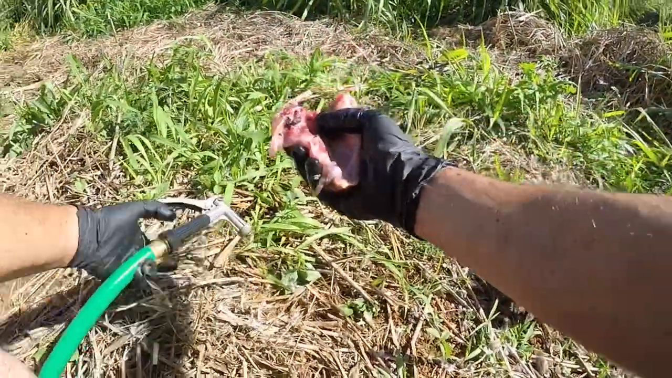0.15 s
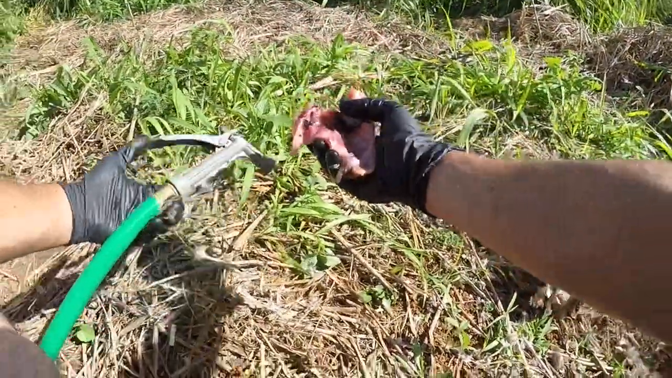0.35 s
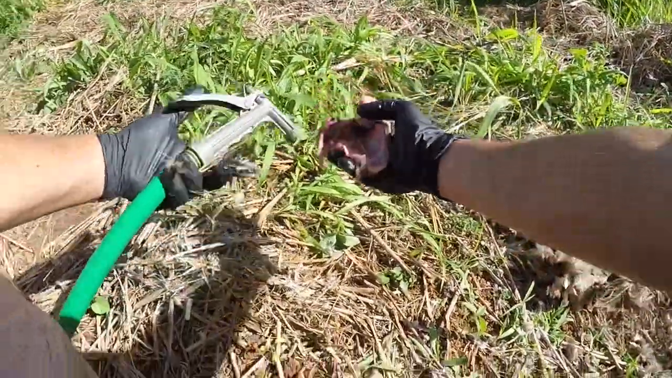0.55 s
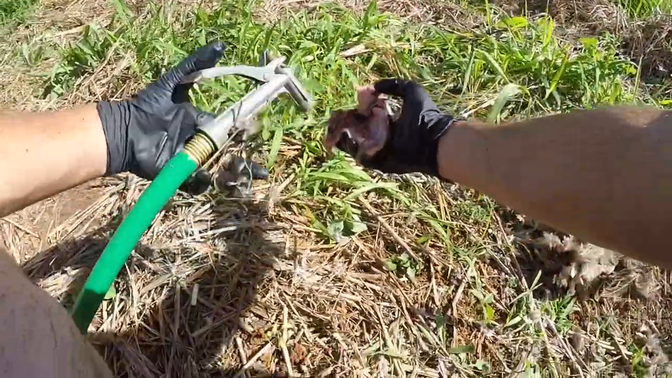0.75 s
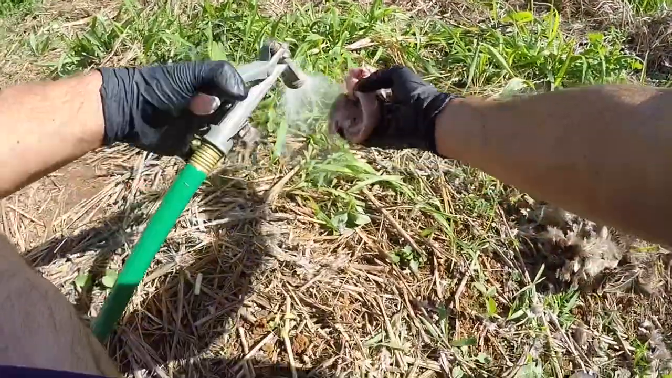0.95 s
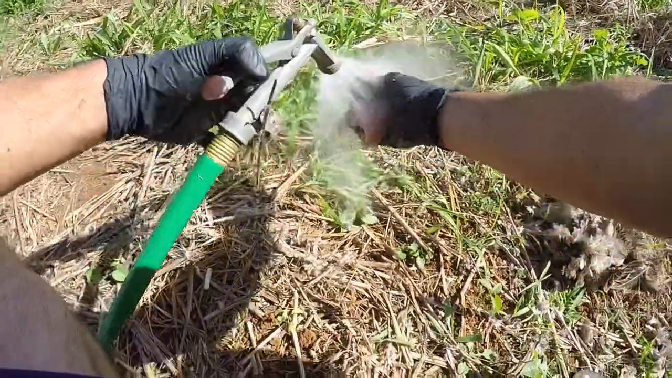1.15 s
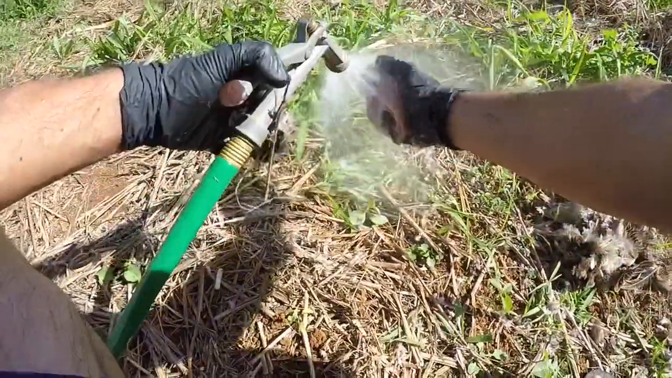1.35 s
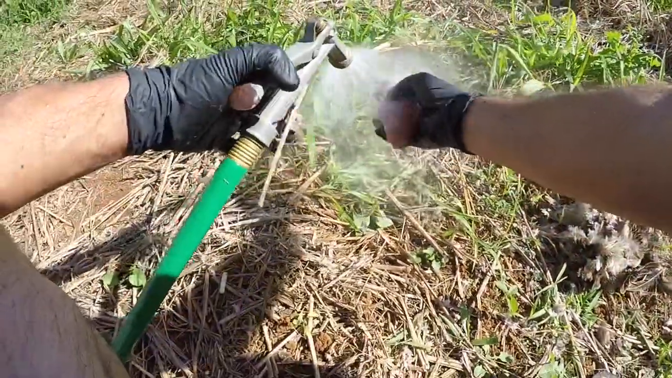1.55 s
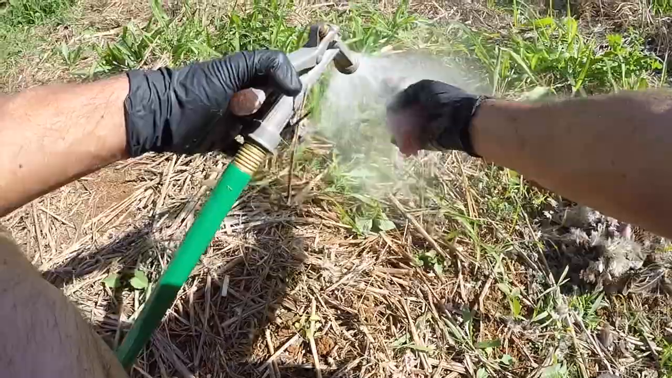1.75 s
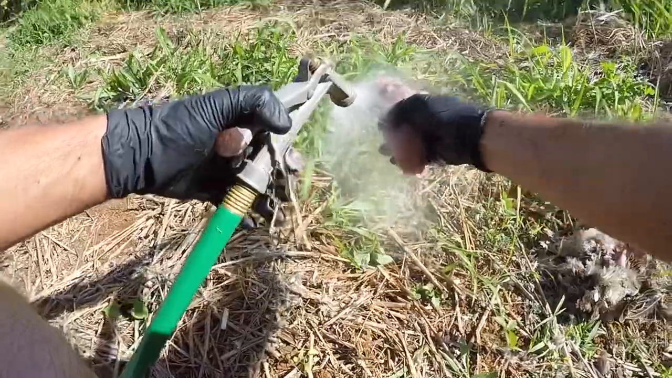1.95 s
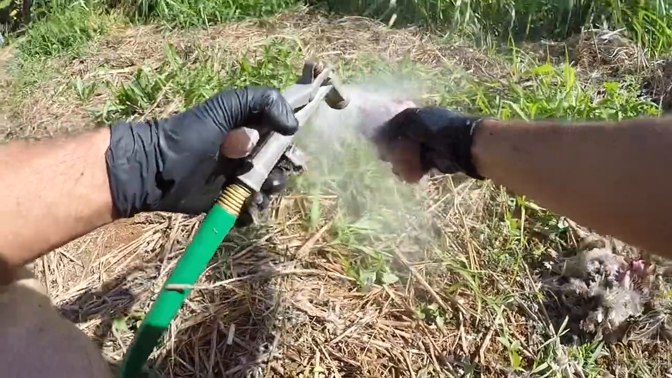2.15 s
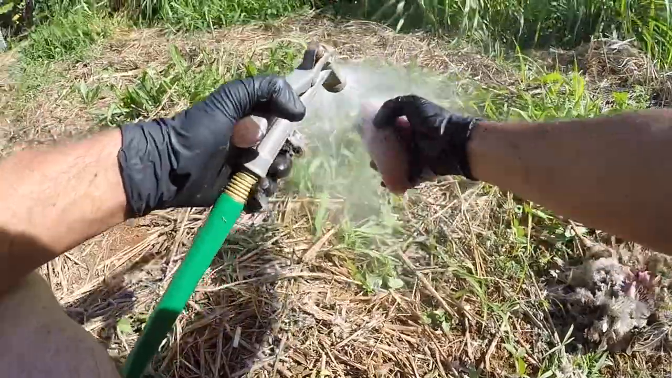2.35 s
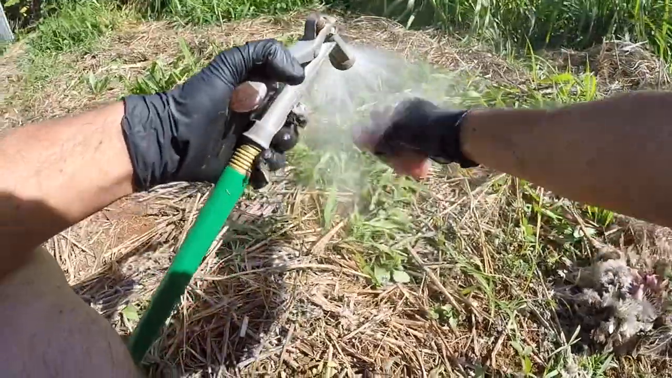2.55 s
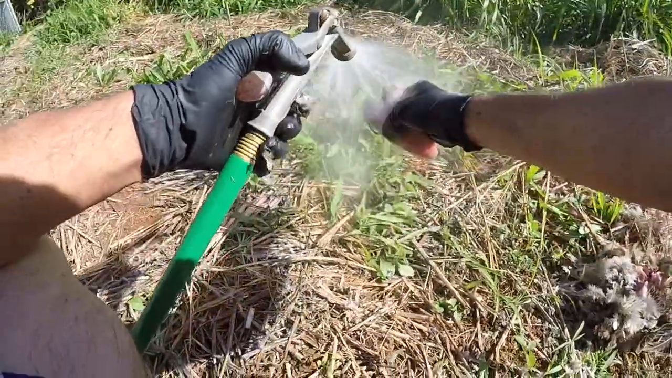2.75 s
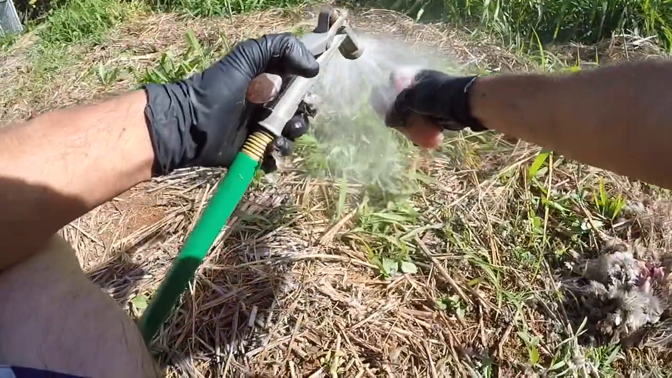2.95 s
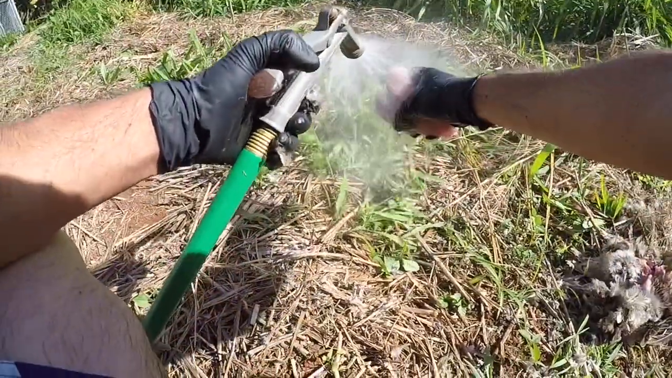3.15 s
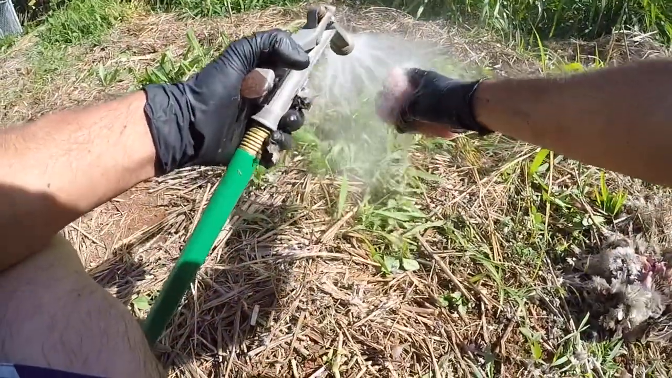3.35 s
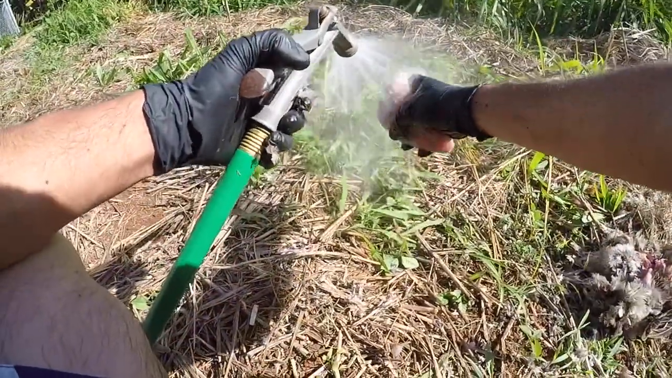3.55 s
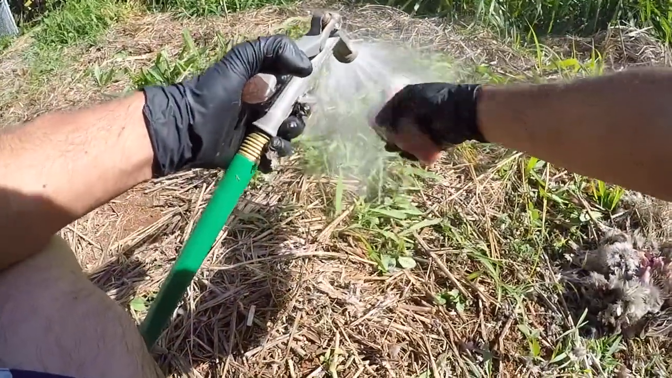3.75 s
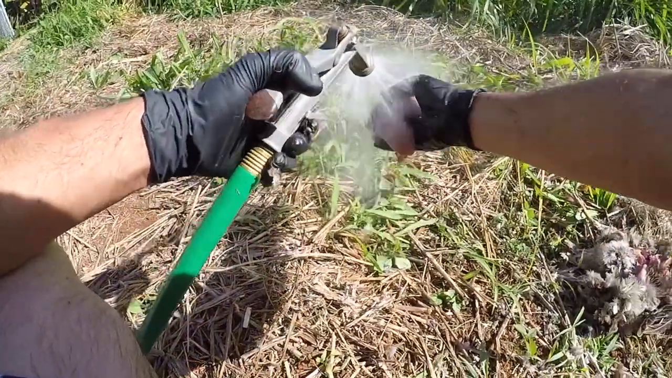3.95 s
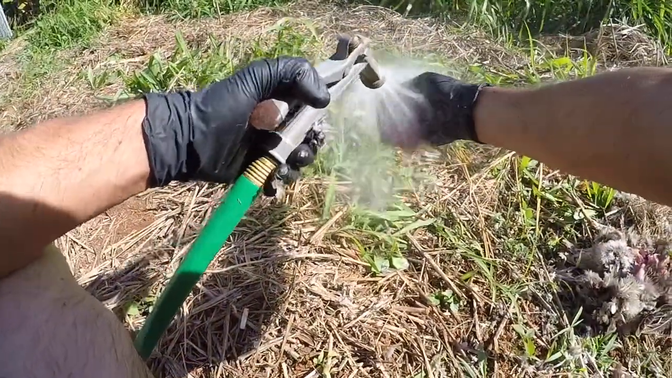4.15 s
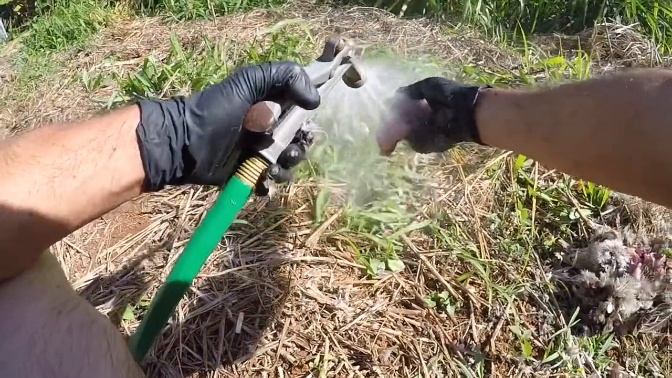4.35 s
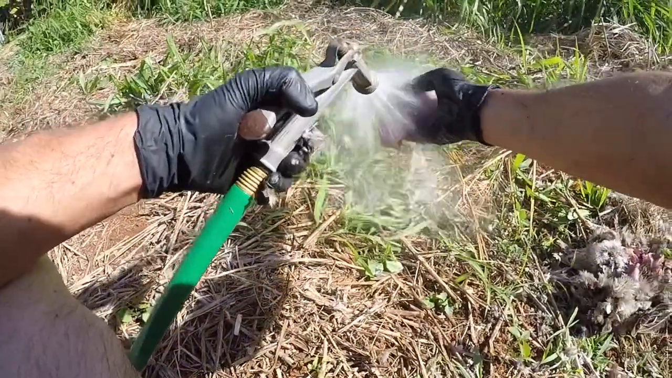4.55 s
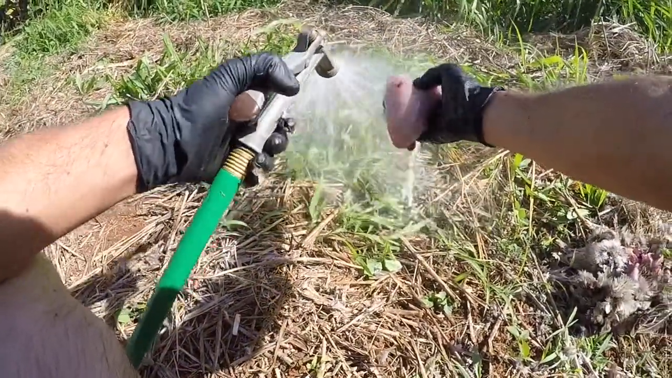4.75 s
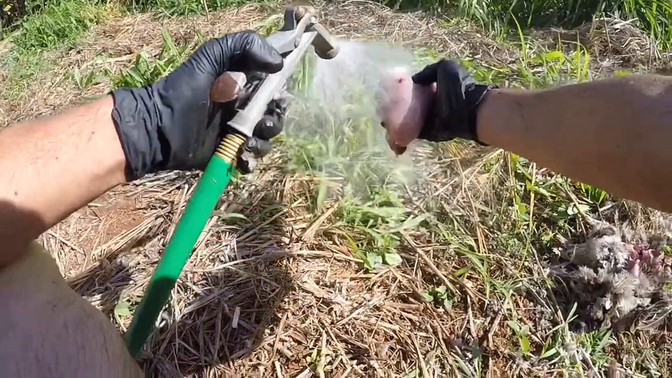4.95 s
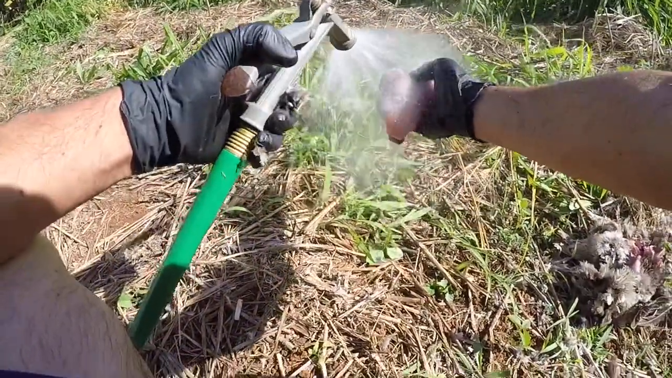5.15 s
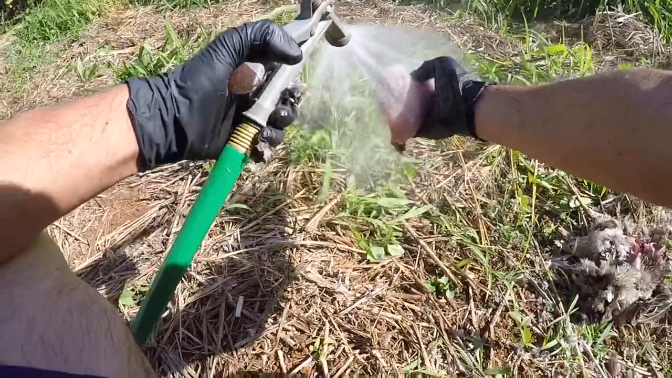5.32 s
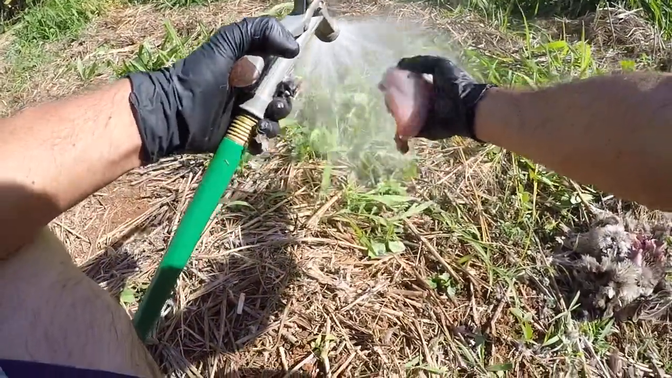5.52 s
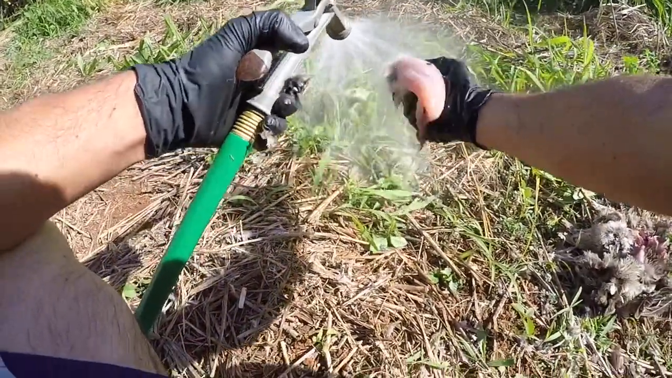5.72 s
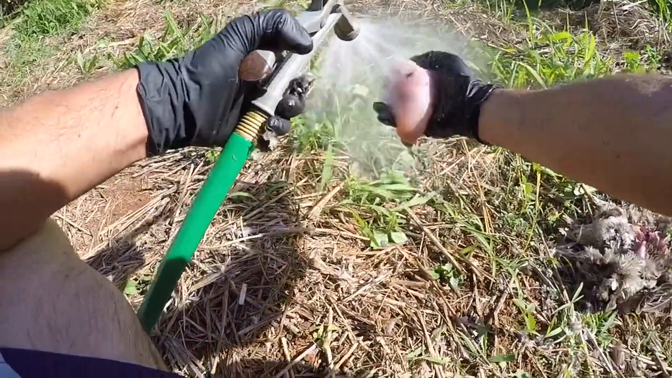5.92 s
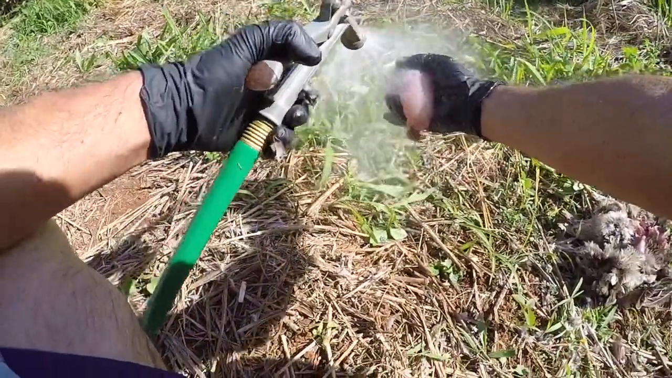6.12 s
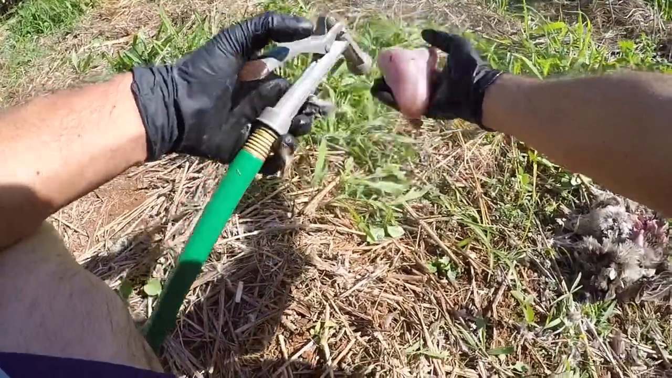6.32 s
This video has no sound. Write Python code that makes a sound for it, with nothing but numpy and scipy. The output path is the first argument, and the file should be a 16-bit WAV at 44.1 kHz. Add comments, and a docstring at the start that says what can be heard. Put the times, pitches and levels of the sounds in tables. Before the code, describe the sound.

Light wind rumble and small metallic clacks, then a bright, steady water spray splattering unevenly over meat in a gloved hand, cut off at the end.

```python
"""Outdoors, a breeze buffets the microphone over a soft bed of leaves and far air, both made of flickering noise.
A pistol-grip hose nozzle is lifted: ringing modes make its loose lever rattle, amid dry ticks and low knocks.
The trigger opens: noise with gliding ridges makes the hissing spray, low noise the roar of water in the hose.
Random drops ring a turning hand, its glove and its palm, and echoes colour the spray and the patter.
The breeze dies down and returns; near the end the trigger shuts and the water stops."""
import sys
import numpy as np
from scipy import signal
from scipy.fft import rfft, irfft, next_fast_len
from scipy.io import wavfile
from scipy.ndimage import uniform_filter1d, map_coordinates

SR = 44100
rng = np.random.default_rng(int(sys.argv[2]) if len(sys.argv) > 2 else 0)


def unload_wav(signal):
    """Save mono or channel-first audio to the path in sys.argv[1] as 16-bit WAV at rate SR, clipped to [-1, 1]."""
    wavfile.write(
        sys.argv[1],
        SR,
        np.round(np.clip(np.atleast_2d(signal).T, -1, 1) * 32767).astype(np.int16),
    )


N = 281358   # length [samples]


def from_db(db):
    """Turn decibels into an amplitude factor."""
    return 10 ** (np.asarray(db) / 20)


def rms_one(x):
    """Scale a sound to an rms of 1."""
    return x / np.sqrt(np.mean(x ** 2) + 1e-20)


def in_time(*tables):
    """Join tables and draw straight lines between their rows: each column at every sample."""
    s, *columns = np.transpose(np.vstack(tables))
    return [np.interp(np.arange(N) / SR, s, c) for c in columns]


def drift(rate):
    """Slow random wandering of spread 1: smoothed noise, quicker for a higher rate."""
    r = np.exp(-80 * np.pi * rate / SR)
    noise = rng.standard_normal(N // 40 + 2002)   # one value per 40 samples
    slow = signal.lfilter([1], [1, -2 * r, r * r], noise)[2000:]   # drop the filter's start-up
    return np.interp(np.arange(N) / 40, np.arange(len(slow)), rms_one(slow))


def bands(spectrum, count):
    """Split coloured noise into overlapping bands (centre [Hz], band) whose sum has rms 1."""
    size = next_fast_len(N)
    log_hz = np.log(np.maximum(np.arange(size // 2 + 1) * SR / size, 1))
    at, db = np.log(np.array(spectrum)[:, 0]), np.array(spectrum)[:, 1]
    below = np.minimum(log_hz - at[0], 0) * 30     # falls away under the first point
    coloured = rfft(rng.standard_normal(size)) * from_db(np.interp(log_hz, at, db) + below)
    coloured /= np.std(irfft(coloured, size))
    centres = np.linspace(at[0], at[-1], count)
    pairs = []
    for centre, one in zip(centres, np.eye(count)):
        share = np.interp(log_hz, centres, one)   # a triangle around this centre
        pairs.append((np.exp(centre), irfft(coloured * share, size)[:N]))
    return pairs


def patchy(spectrum, count, shared_db, own_db, rate):
    """Coloured noise whose bands flicker partly together, partly alone."""
    together = shared_db * drift(rate)
    return sum(from_db(together + own_db * drift(rate)) * band for hz, band in bands(spectrum, count=count))


def resonate(x, modes):
    """Ring a sound through resonances side by side, with alternating signs."""
    out = 0
    for k, (hz, width, db) in enumerate(modes):
        r = np.exp(-np.pi * width / SR)
        feedback = [1, -2 * r * np.cos(2 * np.pi * hz / SR), r * r]
        out = out + (-1) ** k * from_db(db) * signal.lfilter([1 - r * r, 0, r * r - 1], feedback, x)
    return out


def ridge(hz, width, drive=1):
    """Noise in a resonance with a moving centre: slow noise carried on a gliding tone; rms 1."""
    r = np.exp(-np.pi * width / SR)
    noise = rng.standard_normal(N) + 1j * rng.standard_normal(N)
    slow = signal.lfilter([1], [1, -2 * r, r * r], drive * noise)
    return rms_one(np.real(slow * np.exp(2j * np.pi * np.cumsum(hz) / SR)))


def swells(steady_db, middles, levels_db, halves, edge=2):
    """A steady level with bell-shaped swells added in power: a gain at every sample."""
    t = np.arange(0, N + 40, 40) / SR
    shapes = np.exp(-np.abs((t - np.c_[middles]) / np.c_[halves]) ** edge)
    bells = from_db(levels_db) ** 2 @ shapes
    return np.sqrt(from_db(steady_db) ** 2 + np.interp(np.arange(N) / SR, t, bells))


# The breeze dies down and returns: (time [s], buffeting level [dB])
BREEZE = [(0, -36), (.7, -33), (1.5, -38), (2.4, -48.5), (3.4, -57), (4.78, -68), (4.87, -50), (5.55, -48),
          (5.9, -59), (6.38, -63)]
# Single puffs on the microphone port: (middle time [s], level [dB])
PUFFS = [(.07, -32), (.219, -29), (1.328, -30), (1.513, -38), (1.79, -37), (2.228, -44), (2.731, -39),
         (3.495, -38), (4.9, -50), (5.07, -41), (5.709, -49), (5.83, -45)]
# Colour of the buffeting: (frequency [Hz], relative level [dB per Hz])
GUST_COLOUR = [(12, -21), (20, 3.5), (49, -1), (97, -7.5), (130, -7.5), (157, -16), (334, -44), (500, -51),
               (650, -78), (1100, -120)]
PUFF_HALF_S, FLUTTER_DB, FLUTTER_RATE = 0.022, 1.5, 13.5


def wind():
    """Lumpy low noise as air presses on the microphone port; breeze and puffs set its level."""
    lumps = patchy(GUST_COLOUR, count=5, shared_db=3.5, own_db=2.5, rate=5.7)
    evened = lumps / np.sqrt(uniform_filter1d(lumps ** 2, size=SR // 8) + 1e-9)
    breeze_db = in_time(BREEZE)[0] + FLUTTER_DB * drift(FLUTTER_RATE)
    s, puff_db = np.transpose(PUFFS)
    return swells(breeze_db, s, puff_db, PUFF_HALF_S + 0 * s) * evened


# Colour of leaves and far air: (frequency [Hz], relative level [dB per Hz])
FIELD_COLOUR = [(150, 0), (250, 0.5), (500, -12.5), (1400, -19), (3000, -21.5), (6500, -24), (9000, -22),
                (11000, -27), (13000, -33), (15300, -40)]
# Loudness of leaves and far air, in two pieces to be joined: (time [s], level [dB])
FIELD_LEVEL = [
    [(0.0, -46), (0.84, -48)],
    [(6.24, -48.5), (6.38, -47.5)],
]


def field():
    """Leaves and far air: a soft bed of noise with quickly flickering bands."""
    level = from_db(in_time(*FIELD_LEVEL)[0])
    return level * patchy(FIELD_COLOUR, count=10, shared_db=1.0, own_db=1.0, rate=25)


# Dry ticks of glove and trigger: (time [s], peak level [dB], centre [Hz], width [Hz])
TICKS = [(0.13, -31, 5800, 5000), (0.1786, -29, 6940, 7000), (0.2487, -26, 5870, 3000),
         (.2747, -39, 3700, 1500), (.350, -30, 7500, 8000), (0.41, -42, 4000, 5000),
         (.4768, -34, 5000, 5000), (.487, -39, 7500, 4040), (0.498, -39, 7000, 6000),
         (.7532, -42, 3200, 1800), (.800, -35.5, 4400, 1800), (0.855, -39, 4360, 890)]


def ticks():
    """Each tick is a few milliseconds of noise around its centre, too broad to ring on."""
    out, t = np.zeros(N), np.arange(600) / SR
    for (s, peak_db, hz, width), noise in zip(TICKS, rng.standard_normal((len(TICKS), len(t)))):
        body = [(hz, width, 0)]
        burst = resonate(resonate(noise * t * np.exp(-t / 0.00085), body), body)
        out[round(s * SR):][:len(t)] += from_db(peak_db) * burst / np.abs(burst).max()
    return out


# Touches of lever on nozzle body: (time [s], level [dB], lower modes share [dB], upper modes share [dB],
# top mode share [dB], decay time of the rub [s], damping by the grip [times])
RATTLE = [(.158, -52, -26, 3, -30.5, .006, 1.5), (.166, -48, -20, 8, -30, .005, 1.5),
          (.179, -28.5, -14, -6, -40, 0.0027, 2), (.332, -47, -22, 3, -30, 0.0047, 1.3),
          (.338, -40, -14, 3, -34.5, .004, 1.3), (.349, -23.5, -10.5, -5, -34, 0.0032, 1.1),
          (.366, -29, -12, -11, -30, 0.0039, 0.92), (.392, -35, -14, -10, -30, 0.0044, 1.3),
          (0.409, -30, -13, -13, -26, 0.0033, 1.3), (0.454, -50, -16, -8, -30, 0.0067, 1.3),
          (0.476, -34, -4, 2, -12, 0.0034, 1.3), (.484, -33, -6, 2, -10, 0.0049, 1.5),
          (.496, -27, -8, 2.5, -12, 0.0044, 2.1), (.504, -35, -8, 4, -10, 0.0027, 2.3)]
# What the nozzle body rings: (frequency [Hz], level [dB], time to fade by 60 dB before grip damping [s])
NOZZLE_MODES = [(3210, 3, 0.02), (4500, -5, 0.049), (5785, -2.5, 0.051), (6680, -1, 0.036),
                (7200, -7, 0.027), (7450, -6, .025), (8460, -7.5, 0.037), (9200, -22, .025),
                (14100, -2, .05)]
SCRAPE_DB = -36   # dry scrape against the touch


def rattle():
    """Each touch is a short uneven rub that rings the cast body while the grip damps it."""
    out, chance = np.zeros(N), rng.standard_normal((len(RATTLE), len(NOZZLE_MODES), 1200))
    t, long = np.arange(1200) / SR, np.arange(4000) / SR
    scrape_band = signal.butter(2, [2500, 9500], "band", fs=SR, output="sos")
    for (s, level_db, lower_db, upper_db, top_db, rub_s, damping), noise in zip(RATTLE, chance):
        rub = np.minimum(t / 0.0011, 1) * np.exp(-t / rub_s)
        i = round(s * SR)
        grit = signal.sosfilt(scrape_band, noise.sum(axis=0) * rub / rub.max())
        out[i:i + len(t)] += from_db(level_db + max(upper_db, 0) + SCRAPE_DB) * grit
        for (hz, db, t60), own in zip(NOZZLE_MODES, noise):
            share_db = lower_db * (hz < 5000) + upper_db * (6000 < hz < 12000) + top_db * (hz > 12000)
            mode = from_db(-60 * damping * long / t60) * np.sin(2 * np.pi * hz * long)
            rung = signal.fftconvolve(own * rub, mode)
            out[i:i + len(rung)] += from_db(level_db + db + share_db - 2) * rung / np.abs(rung).max()
    return out


# Low knocks: (middle time [s], level [dB], frequency [Hz], half length [s])
THUMPS = [(.216, -15.5, 75, 0.0057), (.443, -23, 83, 0.012), (0.682, -30.5, 101, 0.014),
          (0.902, -22, 137, 0.003)]


def thumps():
    """Each low knock is a brief sine wave, swelling and dying."""
    out, t = np.zeros(N), np.arange(-3000, 3000) / SR
    for s, level_db, hz, half_s in THUMPS:
        knock = np.exp(-(t / half_s) ** 2) * np.sin(2 * np.pi * hz * t)
        out[round(s * SR) - 3000:][:len(t)] += from_db(level_db) * knock
    return out


# The trigger opens and shuts the flow, relative to full flow; the patter obeys it too:
# (time [s], hiss level [dB], roar level [dB], patter level [dB])
VALVE = [(.82, -51, -24, -50), (.87, -28.5, -28, -47), (.93, -8.5, -7.5, -5), (.97, -5, -0.5, -2),
         (1.02, 0, -1, -0.5), (6.12, 0.5, 0.5, 1), (6.138, -2, -2, 2), (6.153, -11, -16, -12),
         (6.195, -22, -17, -12), (6.24, -47, -29, -37)]
# The running spray: (time [s], hiss level before a fixed boost [dB], whistle band over hiss [dB],
# finest mist over hiss [dB], lower ridge [Hz], upper ridge [Hz], how far these two ridges stand out [dB])
SPRAY = [(1.04, -25, 0, -5.5, 5860, 8360, 0.5), (1.28, -25.5, -4.5, -7, 5630, 8210, 0),
         (1.69, -27.5, -3.5, -5, 5830, 8600, 0), (2.04, -31, -1.5, -6, 6100, 8150, -1),
         (2.27, -29.5, -0.5, -5, 5920, 8450, 0.5), (2.58, -26, -4.5, -8, 5880, 8220, 2),
         (2.89, -28.5, -3, -6, 5930, 8600, 2.5), (2.96, -25.5, -3.5, -9.5, 5880, 8270, 0.5),
         (3.25, -27, -4.5, -5, 5840, 8170, 0.5), (3.49, -29.5, -1.5, -5, 6020, 8450, 1),
         (4.07, -26.5, -4.5, -6.5, 5780, 8300, 0.5), (4.39, -27, -2, -6, 6000, 8286, 0),
         (4.82, -29.5, -3, -5, 6160, 8270, 0), (5.0, -28.5, -3, -6, 5810, 8410, 0.5),
         (5.55, -29.5, -2.5, -5.5, 5920, 8470, 0), (5.62, -29, -5, -7.5, 5830, 8490, 0.5),
         (6.03, -30.5, 2.5, -3.5, 5800, 8440, 1), (6.12, -28.5, -4.5, -7, 6040, 8400, 1)]
# Colour of the hiss: (frequency [Hz], relative level [dB per Hz])
HISS_COLOUR = [(700, -17), (1700, -14), (2300, -5.5), (3300, -2), (4500, -5), (5200, -5.5), (6000, -2),
               (7300, -0.5), (8500, -0.5), (9600, -6.5), (11000, -24), (12300, -6.5), (13000, -6.5),
               (14500, -4)]
# Colour of the roar in the hose: (frequency [Hz], relative level [dB per Hz])
ROAR_COLOUR = [(59, -76), (100, -52), (123, -44), (142, -7.5), (211, -5.5), (389, -3), (663, -9),
               (861, -17.5), (1500, -20), (1950, -67), (3300, -120)]
# Mist heard differently at the two microphone ports: (frequency [Hz], relative level [dB per Hz])
MIST_APART = [(6350, -60), (10800, -51), (11100, -17), (11400, -6), (12200, 6), (14700, 5.5), (15300, -0.5)]
APART_DB = -1.5
ROAR_DB, ROAR_FOLLOWS_HISS = -31.5, 0.067   # level; dB of roar per dB of hiss
RIDGE_WIDTHS_HZ, RIDGE_LEVELS_DB = (1270, 810, 900), (-6.5, -8, -15)   # lower, upper, top ridge
TOP_RIDGE_HZ, RIDGE_WANDER = 14050, 0.013   # wander as a share of the frequency
DIP_DB, DIP_DEEPENS = 0.1, 0.55   # the dip between the ridges, deeper as they stand out


def spray():
    """Turbulent hiss at the orifice with ridges and mist, plus roar in the hose; also the left-right part."""
    hiss_db, whistle_db, mist_db, low_hz, upper_hz, ridged_db = in_time(SPRAY)
    dip_db = DIP_DB - DIP_DEEPENS * ridged_db
    valve_db, hose_db, _ = in_time(VALVE)
    running = slice(N // 4, 3 * N // 4)
    roar_db = ROAR_DB + ROAR_FOLLOWS_HISS * (hiss_db - hiss_db[running].mean()) + hose_db
    hiss_db = hiss_db + valve_db
    top_hz = TOP_RIDGE_HZ * (1 + RIDGE_WANDER * drift(1.2))
    apart_noise = patchy(MIST_APART, count=5, shared_db=-1.0, own_db=-0.5, rate=5.2)
    apart = from_db(hiss_db + mist_db + APART_DB) * apart_noise

    # the hiss colour holds the average balance, so only changes around it remain
    whistle_db = whistle_db - whistle_db[running].mean()
    mist_db = mist_db - mist_db[running].mean()
    hiss, together = 0, 1.0 * drift(27.0)
    for hz, band in bands(HISS_COLOUR, count=22):
        whistling = np.interp(hz, [7000, 8000, 10000, 11500], [0, 1, 1, 0])
        misty = np.interp(hz, [10000, 11500], [0, 1])
        dipping = np.interp(hz, [6200, 7100, 8000], [0, 1, 0])
        flicker_db = together + 1.55 * drift(2.8) + 1.37 * drift(4.6)
        hiss = hiss + from_db(dipping * dip_db + whistling * whistle_db + misty * mist_db + flicker_db) * band

    changes_db = (ridged_db, ridged_db + whistle_db, mist_db)
    centres_hz = (low_hz, upper_hz, top_hz)
    for hz, db, change_db, width in zip(centres_hz, RIDGE_LEVELS_DB, changes_db, RIDGE_WIDTHS_HZ):
        hiss = hiss + from_db(db + change_db + together) * ridge(hz, width)
    roar = from_db(roar_db) * patchy(ROAR_COLOUR, count=6, shared_db=1.13, own_db=0.03, rate=2.1)
    return from_db(hiss_db + 3.0) * hiss + roar, apart


DROPS_PER_S, DROP_SPREAD_DB = 5000, 1.5


def drops():
    """A dense hail of uneven drops, arriving in clumps; rms 1."""
    sizes_db = DROP_SPREAD_DB * np.minimum(rng.exponential(1, N), 5)
    sizes = from_db(sizes_db) * rng.choice([-1, 1], N)
    landing = rng.random(N) < DROPS_PER_S / SR * from_db(0)
    return rms_one(sizes * landing * from_db(1.4 * drift(23)))


# The hand swings into the thick of the spray: (middle time [s], patter level [dB],
# half length, shortened for the glove [s], taut glove share [dB], cupped palm share [dB], hollow [Hz])
SPLASHES = [(1.025, -23, 0.026, 0, -27, 3010.0), (1.099, -27.0, 0.055, 0, -27, 2890),
            (1.369, -30, 0.11, -0.5, -12, 2860), (1.511, -25.5, 0.04, -9, -16, 2820),
            (1.804, -24, 0.097, -5.5, -21, 2860.0), (2.132, -28.0, 0.075, -6, -21, 2924),
            (2.246, -23.5, 0.047, -8, -20, 2800.0), (2.349, -28, 0.048, -11, -13.0, 2805),
            (2.542, -31.5, 0.05, -9, -7, 2830), (2.763, -25.5, 0.031, -5, -15, 2754),
            (2.969, -26, 0.041, -7, -10.0, 2734), (3.15, -30, 0.032, -3, -4.5, 2826),
            (3.76, -23.5, 0.029, -6, -31, 2936), (3.895, -27.0, 0.091, -20, -17, 2844),
            (4.038, -30.5, 0.042, -17, -14, 2670.0), (4.149, -24, 0.039, -0.5, -17, 2730.0),
            (4.378, -22.5, 0.029, -2, -14.5, 2743), (4.458, -28.5, 0.031, -4, -15, 2780),
            (4.543, -25, 0.035, 0.5, -17, 2830), (4.6, -25, 0.029, -6, -15, 2760),
            (4.985, -25.0, 0.049, -10.0, -19, 2738), (5.108, -25.5, 0.025, -15, -18, 2750),
            (5.177, -25.0, 0.031, -11.0, -18, 2820), (5.345, -30, 0.042, -9, -10, 2827),
            (5.422, -24.0, 0.026, -8, -18, 2805), (5.578, -28.0, 0.051, -6, -14, 2796),
            (5.815, -36, 0.04, -11, -3, 2844), (5.913, -26, 0.017, -8.0, -22, 2844),
            (5.98, -23.5, 0.028, -8, -13, 2580), (6.093, -25.5, 0.053, -18, -20, 2660)]
# What drops ring on meat: (frequency [Hz], width [Hz], level [dB])
MEAT = [(2400, 540, 0.5), (2740, 520, 1.5), (3087, 346, -3.5)]
# What drops ring on the taut glove: (frequency [Hz], width [Hz], level [dB])
GLOVE = [(3275, 610, 2.54), (3953, 224, 4.4), (4840, 800, 0.57)]
# What drops ring in the cupped palm: (frequency [Hz], width [Hz], level [dB])
PALM = [(984, 170, 0), (1410, 326, 3), (2190, 1180, 0)]
DRIZZLE_DB = (-35.5, -37, -43.5)   # steady patter between splashes on meat, glove and palm
HOLLOW_DB, HOLLOW_WIDTH_HZ = -4, 760
SPLASH_EDGE, GLOVE_LENGTH_SHARE = 1.86, 0.74   # squareness (2 = bell); the glove is struck more briefly


def patter():
    """Drops ring meat, glove and palm, and the hollow between them, as the hand meets the spray."""
    s, patter_db, half_s, glove_db, palm_db, hollow_hz = np.transpose(SPLASHES)
    meat_steady, glove_steady, palm_steady = DRIZZLE_DB
    meat = swells(meat_steady, s, patter_db, half_s, SPLASH_EDGE)
    glove = swells(glove_steady, s, patter_db + glove_db, GLOVE_LENGTH_SHARE * half_s, SPLASH_EDGE)
    palm = swells(palm_steady, s, patter_db + palm_db, half_s, SPLASH_EDGE)
    hail, other_hail = drops(), drops()

    def ring(x, modes):
        """Filter twice, so that the valleys between resonances stay dark."""
        return rms_one(resonate(resonate(x, modes), modes))

    hollow = ridge(np.interp(np.arange(N) / SR, s, hollow_hz), HOLLOW_WIDTH_HZ, np.abs(hail))
    near = from_db(-4.5) * ring(hail, MEAT) + from_db(HOLLOW_DB) * hollow
    struck = meat * near + glove * ring(hail, GLOVE) + palm * ring(other_hail, PALM)
    return from_db(in_time(VALVE)[2]) * struck


# Reflection off the moving hand and arm: (time [s], extra path delay [ms])
HAND_ECHO = [(.9, 0.71), (2.0, 0.85), (2.3, 1.6), (2.75, 1.52), (3.2, 2.16), (3.8, 1.6), (4.05, 0.76),
             (6.2, 0.76)]
HAND_ECHO_DB, GROUND_ECHO_MS, GROUND_ECHO_DB = -15, 2.6, -15.5


def reflect(x):
    """Bright echoes off hand and ground comb the sound; the combs slide as the arms sway."""
    delay_ms, = in_time(HAND_ECHO)
    bright = signal.sosfilt(signal.butter(2, [3500, 10000], "band", fs=SR, output="sos"), x)

    def late(ms):
        """The bright part, delayed by a changing time."""
        return map_coordinates(bright, [np.arange(N) - ms * SR / 1000], order=3)

    hand = from_db(HAND_ECHO_DB) * late(delay_ms)
    ground = from_db(GROUND_ECHO_DB) * late(GROUND_ECHO_MS + 0.166 * drift(0.56))
    return x + hand + ground


LEFT_TREBLE_HZ, LEFT_TREBLE_SHARE = 12000, 0.18


def scene():
    """Add all sources, then spread the fine mist and the highest treble between left and right."""
    jet, apart = spray()
    mid = reflect(jet + patter()) + rattle() + ticks() + thumps() + wind() + field()
    # only the shortest waves reach the two ports differently, a little stronger on the left
    treble = signal.sosfiltfilt(signal.butter(8, LEFT_TREBLE_HZ, "high", fs=SR, output="sos"), mid)
    side = apart + LEFT_TREBLE_SHARE * treble
    return np.array([mid + side, mid - side])


CUTOFF_HZ = 15270


def record(dry):
    """A steep low-pass filter cuts the top."""
    return signal.sosfilt(signal.ellip(16, .5, 90, CUTOFF_HZ, fs=SR, output="sos"), dry)


dry = scene()
out = record(dry)
unload_wav(out)
```